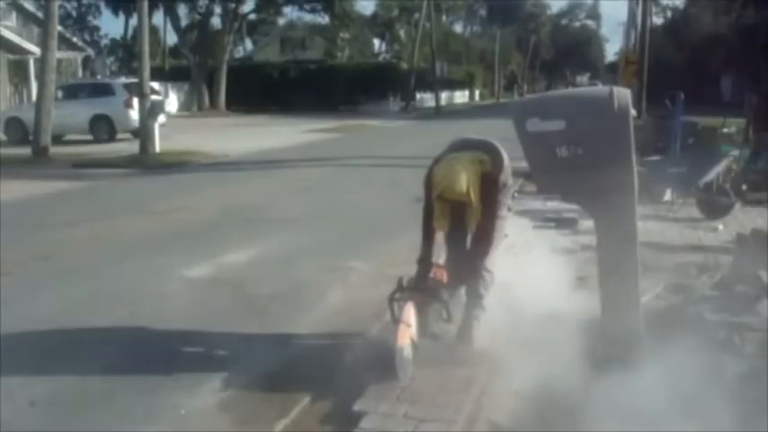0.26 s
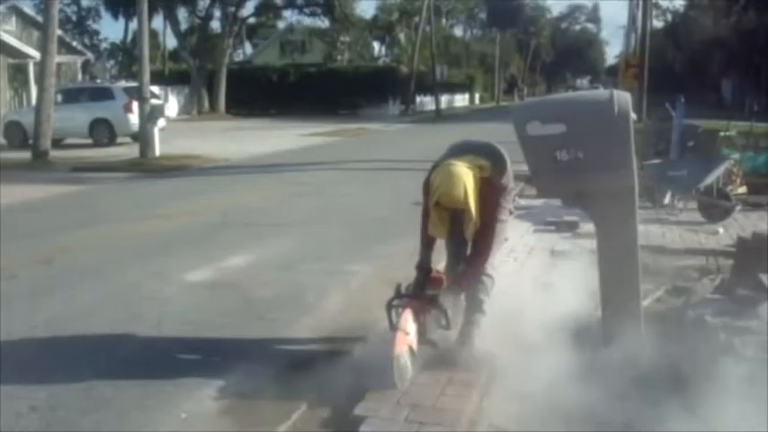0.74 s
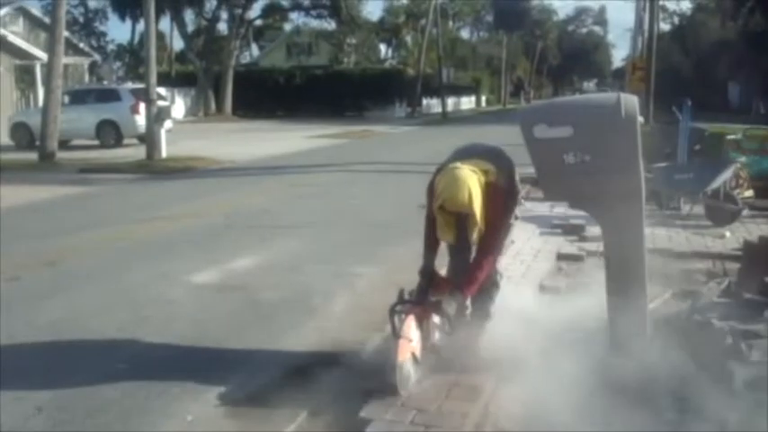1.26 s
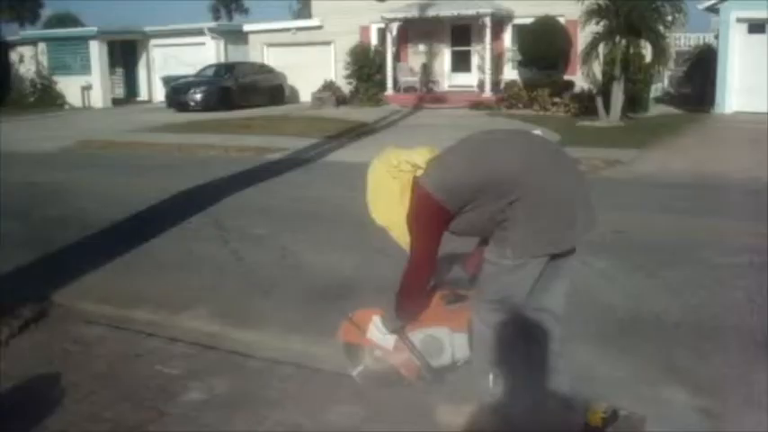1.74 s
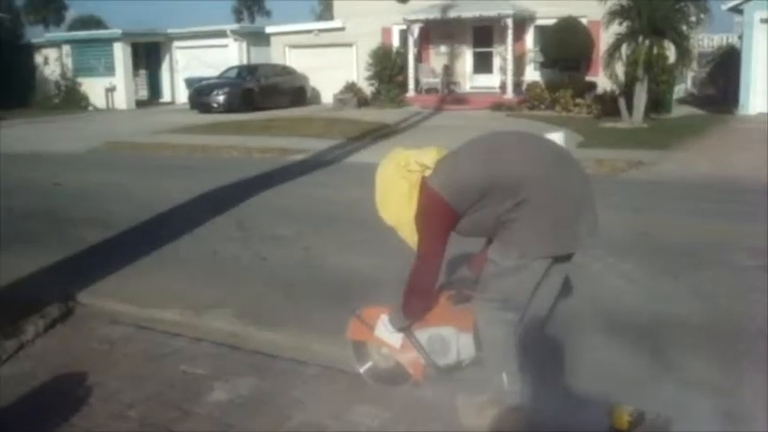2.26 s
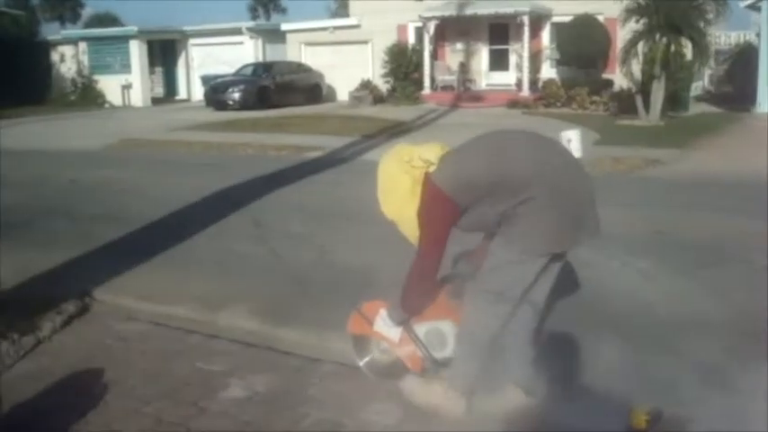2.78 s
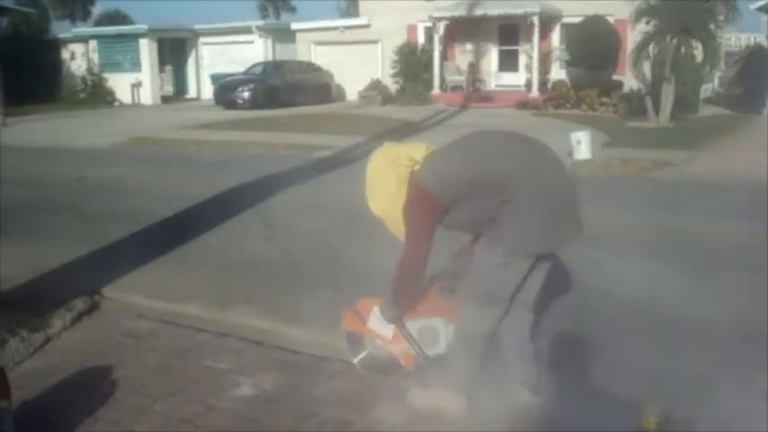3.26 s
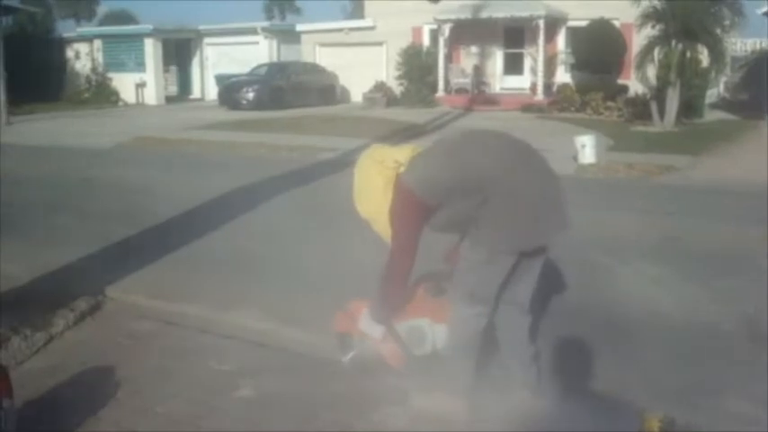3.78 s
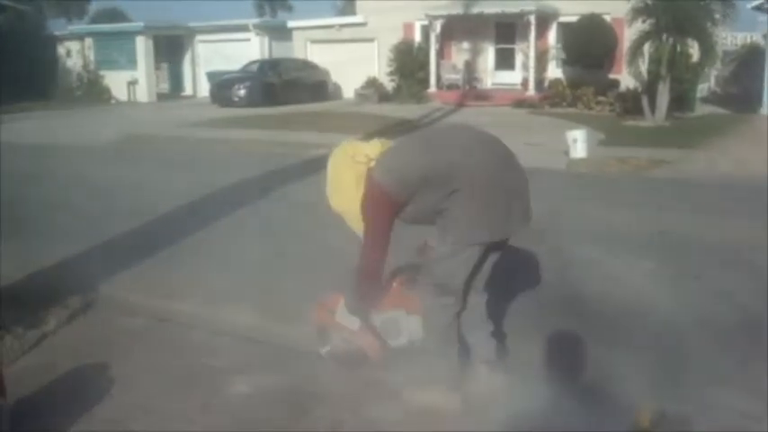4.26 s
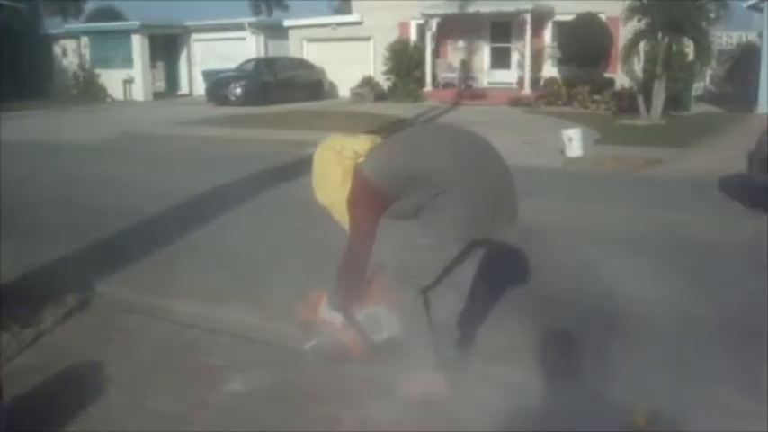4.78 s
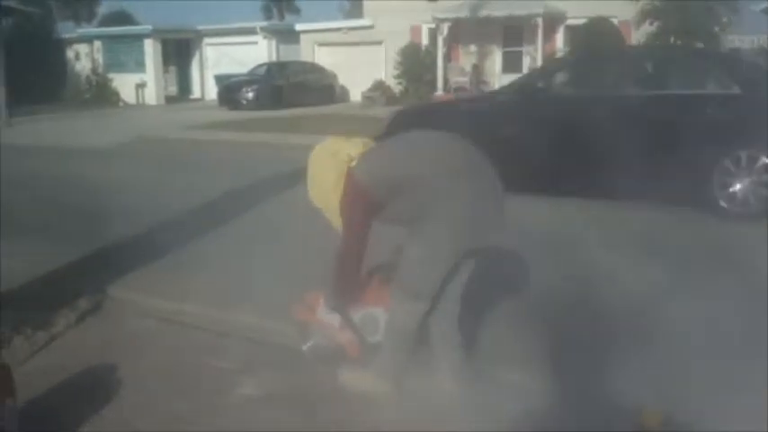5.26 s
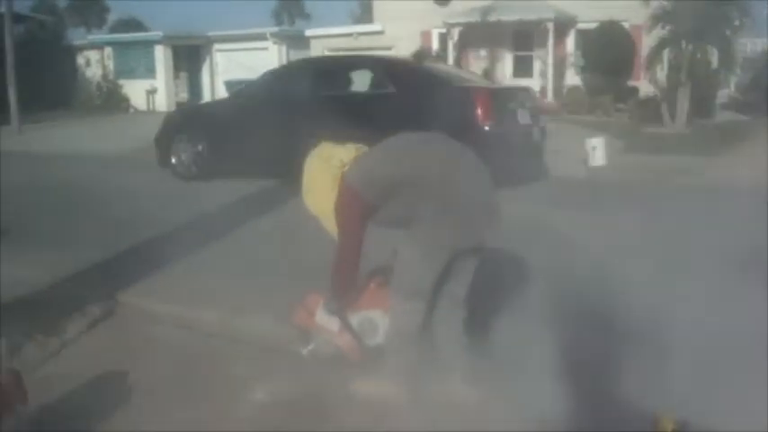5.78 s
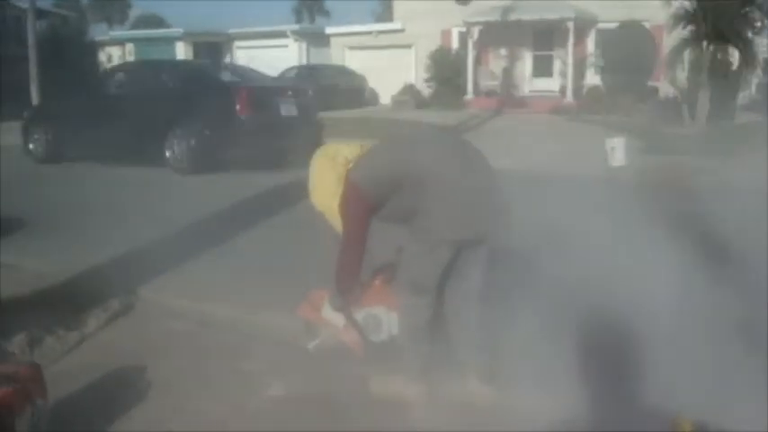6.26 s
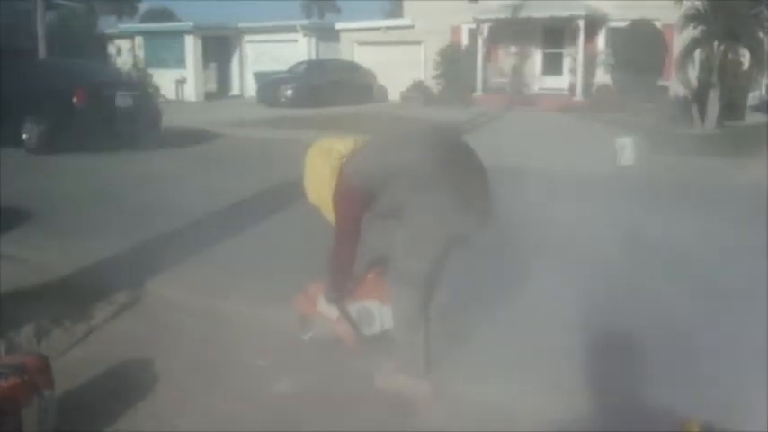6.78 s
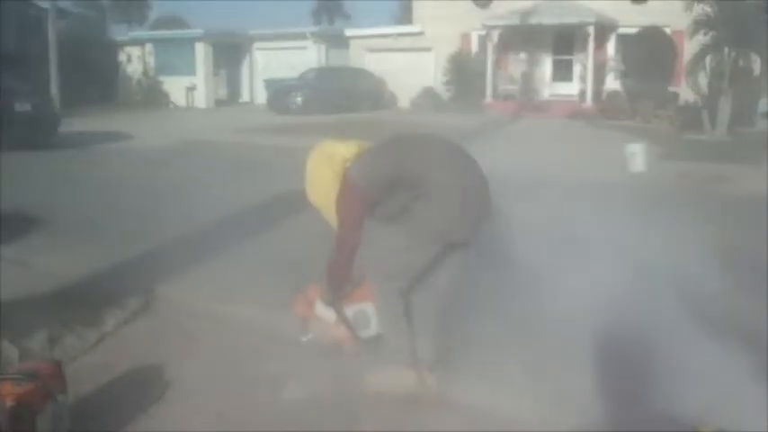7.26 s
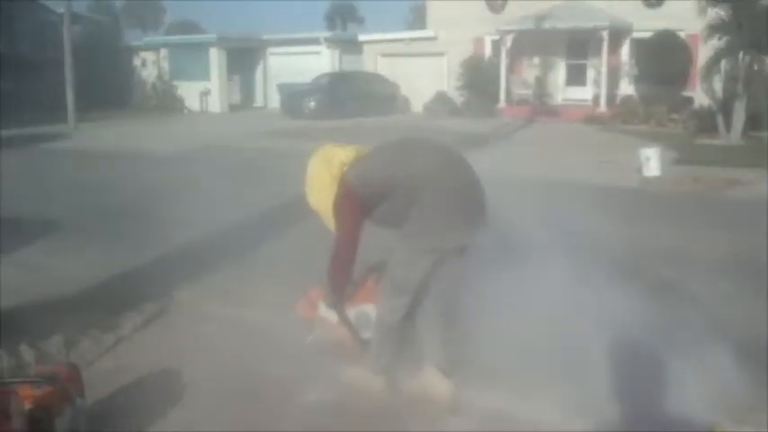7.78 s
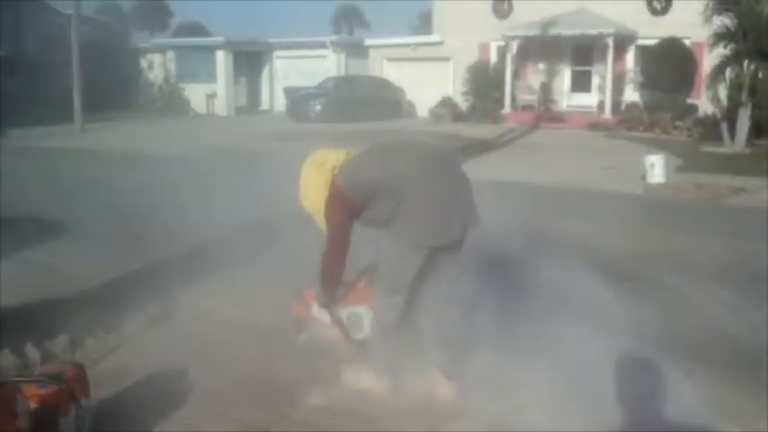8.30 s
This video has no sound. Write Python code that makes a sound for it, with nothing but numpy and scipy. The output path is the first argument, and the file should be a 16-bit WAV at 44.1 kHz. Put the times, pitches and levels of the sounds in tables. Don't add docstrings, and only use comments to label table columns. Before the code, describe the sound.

A petrol cut-off saw grinds through concrete on an open street, engine surging and sagging while the blade hisses and rings brightly and continuously.

```python
import sys
import numpy as np
from scipy import signal
from scipy.fft import rfft, irfft, next_fast_len
from scipy.io import wavfile
from scipy.ndimage import uniform_filter1d

SR = 44100
rng = np.random.default_rng(int(sys.argv[2]) if len(sys.argv) > 2 else 0)


def ratio_of_db(decibels):
    return 10 ** (np.asarray(decibels, float) / 20)


def dump_mix(stems):
    frames = np.atleast_2d(stems).T
    limited = np.clip(frames, -1, 1)
    pcm = np.round(limited * 32767).astype(np.int16)
    wavfile.write(sys.argv[1], SR, pcm)


N = 376162
MOVE_S = 1.79


def rms_one(x):
    return x / np.sqrt(np.mean(np.abs(x) ** 2) + 1e-20)


def in_time(rows):
    s, *columns = np.transpose(rows)
    return [np.interp(np.arange(N) / SR, s, c) for c in columns]


def by_spot(first, second):
    return np.where(np.arange(N) < MOVE_S * SR, first, second)


def drift(rate):
    r = np.exp(-40 * np.pi * rate / SR)
    noise = rng.standard_normal(N // 20 + 2002)
    slow = signal.lfilter([1], [1, -2 * r, r * r], noise)[2000:]
    return np.interp(np.arange(N) / 20, np.arange(len(slow)), rms_one(slow))


def coloured(x, table):
    size = next_fast_len(N + SR // 4)
    log_hz = np.log(np.arange(size // 2 + 1) * SR / size + 1)
    at, *spots = np.transpose(table)
    spectrum = rfft(x, size)
    heard = [irfft(spectrum * ratio_of_db(np.interp(log_hz, np.log(at), db)), size)[:N] for db in spots]
    return by_spot(*heard)


def lowpassed(x, order, hz):
    sos = signal.butter(order, hz, fs=SR, output="sos")
    return signal.sosfiltfilt(sos, x, padtype="even", padlen=SR // 10)


# (time [s], level [dB])
FAR_HUM = [
    (0, -90),
    (4, -88),
    (5.5, -69),
    (7, -73),
    (8.53, -65),
]
HUM_HZ = 91.5


def hum():
    phase = 2 * np.pi * HUM_HZ * np.arange(N) / SR
    steady = ratio_of_db(in_time(FAR_HUM)[0] - 2.5) * (np.sin(phase) + 1.6 * np.sin(2 * phase))
    wavering = ratio_of_db(-65.5 + 3 * drift(3)) * np.sin(3 * phase + drift(7.2))
    return steady + wavering


# (time [s], pressure on the stone [dB], grit brightness [dB], engine labour [dB])
PRESSURE = [(0, -1.5, -1.5, -0.5), (.22, -1.5, -4, 1), (.45, -0.5, -2.5, 0.5), (.97, -.5, -3.5, 0),
            (1.25, -0.5, -2.5, 1), (1.76, -0.5, -3, -0.5), (1.82, -1.5, -2, -1), (2.9, -3, -1, 0),
            (3.5, -2, 0, 0), (3.76, -0.5, 1, -1), (4.2, -1.5, 0, -1), (4.6, -1, 2, 0.5), (5.1, -2.5, 1, 0),
            (5.35, 0, 1, -0.5), (6.05, -1, 1, 0.5), (6.75, -.5, 0.5, 0), (7.8, -0.8, 2, 1.5),
            (8.53, 0.5, 0, -0.5)]
# (rumble, low modes, high modes, hiss [dB per dB])
FOLLOWS = (.3, 1.13, 0.3, 1.1)
# (time [s], high modes [dB], low modes [dB])
SNAGS = [(.18, -0.5, -1), (.3, -3.5, -1), (.47, 2.5, 0), (.65, 2.5, 3), (.78, 0.5, 0.5), (.95, 0, -1.5),
         (1.17, -2.5, 1), (1.45, 2, 0), (1.92, 4.5, 0), (2.08, -2.5, -0.5), (2.27, 2.5, 0.5), (3.15, 4, 1),
         (3.75, 0.5, 2), (3.9, 3.5, 0), (4.12, -2, -1.5), (4.23, 1.5, -0.5), (4.42, 1.5, -1),
         (5.12, 1, -1.5), (5.27, 3.5, -1.5), (5.96, 1.5, 0.5), (6.08, -0.5, 5), (6.72, -1.5, 0),
         (7.0, -1, 1), (7.55, -2, -0.5), (8.07, 4, 0.5), (8.53, 3.5, -0.5)]
SNAG_S, SNAG_HISS_SHARE = 0.055, 0.2
WANDER_DB, WANDER_PER_S = 0.7, 11.1


def cutting():
    pressure_db, bright_db, labour_db = in_time(PRESSURE)
    t = np.arange(N) / SR
    snag_db, snag_low_db = sum(np.outer(db, np.exp(-((t - s) / SNAG_S) ** 2)) for s, *db in SNAGS)
    extras = (labour_db, snag_low_db, snag_db - 0.5 * bright_db, SNAG_HISS_SHARE * snag_db + bright_db)
    swings = [share * pressure_db + extra + WANDER_DB * drift(WANDER_PER_S)
              for share, extra in zip(FOLLOWS, extras)]
    moved = round(MOVE_S * SR)
    return [c - by_spot(c[:moved].mean(), c[moved:].mean()) for c in swings]


def shake(turns, depth):
    return 1 + depth * np.cos(2 * np.pi * turns)


HISS_EDGES_HZ = (6900, 7900, 9000)
MOTTLE_DB, MOTTLE_PER_S = 1.0, 4.0


def mottled(hiss):
    below = [0]
    for hz in HISS_EDGES_HZ:
        below.append(signal.sosfilt(signal.butter(3, hz, fs=SR, output="sos"), hiss))
    below.append(hiss)
    return sum((b - a) * ratio_of_db(MOTTLE_DB * drift(MOTTLE_PER_S)) for a, b in zip(below, below[1:]))


# (frequency [Hz], first level [dB per Hz], second level [dB per Hz])
RUB = [(60, -100, -96), (100, -99.5, -91), (200, -85, -88), (363, -85, -82.5), (653, -67.5, -71),
       (960, -73.5, -70), (1302, -79.5, -81.5), (2004, -65.5, -66.5), (2046, -71.5, -75.5),
       (2650, -66, -67.5), (3290, -64, -65), (4600, -63.5, -71), (4900, -59, -66.5), (6700, -66.5, -70.5),
       (10700, -71.5, -70)]


def rubbing(turns, rumble_db, body_db, hiss_db, patchy_db=0.93, gust_db=5.5):
    grain_size = ratio_of_db(1.6 * rng.standard_normal(N // 40 + 1)).repeat(40)[:N]
    grit = rms_one(rng.standard_normal(N) * grain_size) * np.sqrt(SR / 2)
    noise = coloured(grit, RUB) * shake(turns, by_spot(0.084, 0.038))
    breeze, low, mid = [lowpassed(noise, 2, hz) for hz in (110, 2600, 6000)]
    lag = (0.004106 + 6e-6 * drift(0.7)) * SR
    noise = noise - 0.54 * np.interp(np.arange(N) - lag, np.arange(N), noise - mid, left=0)
    out = breeze * ratio_of_db(gust_db * drift(4) - 6)
    ranges = (low - breeze, mid - low, mottled(noise - mid))
    for part, db in zip(ranges, (rumble_db, body_db, hiss_db)):
        out = out + part * ratio_of_db(db + patchy_db * drift(20.4))
    return out


BLADE_HZ = [1776, 2261, 2466, 2650, 2968, 3095, 3187, 3286, 3437, 3522, 3722, 3960, 4040, 4165, 4484, 4570,
            4652, 4840, 5155, 5312, 5809, 6212, 6475, 7390, 7671, 7881, 8312, 8613, 9862, 610]
# (width [Hz], shift [Hz per extra turn per s], first level [dB], second level [dB])
BLADE = [(65, -1.5, -46, -45.5), (46.3, 0, -45, -49.5), (52, -2, -61.5, -47), (60, -2, -62.5, -51.5),
         (50.3, -2, -37, -43), (51.3, 3, -43, -41.5), (46.5, 3, -45, -38.5), (35, 0.5, -40.5, -40.5),
         (27, -4, -42, -45), (50, 0.5, -36.5, -48), (45.2, -5, -47, -43.5), (45, -1.5, -53, -42.5),
         (40, 0, -42, -44), (35, -1.5, -39.5, -49.5), (22, -0.5, -50, -43), (40, 1.5, -44, -40.5),
         (62, 3, -33.5, -38.5), (25, 0, -66, -40.5), (66, 6.5, -45, -39), (51, 3.5, -37, -38.5),
         (60, 0.5, -38, -40.5), (36, 0.5, -63, -70), (65, -1, -41.5, -48), (150, 9.5, -39, -57),
         (60, 7, -53, -56.5), (150, 9.5, -40.5, -58), (50, 1, -47, -60.5), (60, 6, -48, -51),
         (100, -1, -67, -50), (40, 3, -50, -58.5)]
# (mode counted from 0, lean [dB per extra turn per s])
LEANING = [
    (6, -0.32),
    (7, 0.17),
    (8, 0.02),
    (13, 1.2),
    (19, -0.5),
]


def blade(turns, speed, rumble_db, low_db, high_db, hiss_db, swell_db=2.0):
    out, t = np.zeros(N), np.arange(N) / SR
    extra_speed = by_spot(0, speed - 120)
    lean = {round(k): db for k, db in LEANING}
    for k, (hz, (width, shift, first_db, second_db)) in enumerate(zip(BLADE_HZ, BLADE)):
        phase = 2 * np.pi * (hz * t + shift * (turns - 120 * t))
        tone = drift(width * 0.54) * np.cos(phase) + drift(width * 0.68) * np.sin(phase)
        push_db = rumble_db if hz < 2700 else low_db if hz < 4300 else high_db if hz < 6000 else hiss_db
        level_db = by_spot(first_db, second_db) + lean.get(k, 0) * extra_speed
        out += tone * ratio_of_db(level_db + push_db + swell_db * drift(3.6))
    return out * shake(turns, by_spot(0.23, 0.049))


# (start [s], end [s], speed at start [turns per s], speed at end [turns per s])
SPURTS = [(.16, .28, 110.4, 112.0), (.6, .8, 111.7, 114.2), (1.03, 1.41, 112.5, 115.3),
          (1.72, 1.87, 112.3, 117.0), (2.09, 2.42, 115.4, 120.3), (2.86, 3.07, 116.5, 120.2),
          (3.4, 3.64, 117.8, 120.0), (3.89, 4.23, 116.7, 121.2), (4.67, 4.93, 116.2, 120.0),
          (5.12, 5.47, 117.6, 120.9), (5.72, 5.98, 118.4, 121.1), (6.26, 6.6, 117.5, 122.6),
          (6.76, 7.03, 121.2, 124.9), (7.25, 7.8, 120.9, 127.8), (8.02, 8.42, 125.2, 130.3)]
START_SPEED, END_SPEED = 111.7, 129.8
FLYWHEEL_S, SWITCH_S = 0.07, 0.03
HELD_SHARE, SPURT_SHARE = 0.95, 0.05


def hunting():
    start, end, low, high = np.transpose(SPURTS)
    t = np.arange(N) / SR
    s = np.r_[0, np.ravel([start, end], "F"), N / SR]
    speed = np.interp(t, s, np.r_[START_SPEED, np.ravel([low, high], "F"), END_SPEED])
    spurting = np.searchsorted(s[1:], t) % 2
    cut = uniform_filter1d(np.where(spurting, SPURT_SHARE, HELD_SHARE), round(SWITCH_S * SR))
    return uniform_filter1d(speed, round(FLYWHEEL_S * SR), mode="nearest"), np.clip(cut, 0, 1)


# (frequency [Hz], first level [dB], second level [dB])
EXHAUST = [(60, -99, -84.5), (115, -76, -75.5), (238, -69, -65), (290, -50.5, -52.5), (360, -60.5, -55),
           (464, -61, -58.5), (567, -55, -57), (700, -46, -69.5), (800, -85, -86.5), (921, -48.5, -57.5),
           (970, -49.5, -49.5), (1090, -55.5, -58), (1340, -54.5, -76.5), (1640, -61, -52.5),
           (2400, -46.5, -56)]
# (frequency [Hz], width [Hz], first level [dB], second level [dB])
HOUSING = (988.5, 16, -8.5, 0.5)
# (time [s], level [dB])
GRIP = [(0, -56), (1.8, -47), (2.6, -39.5), (3.05, -46.5), (3.8, -43), (4.45, -38.5), (4.75, -44),
        (5.0, -41.5), (5.3, -52.5), (6.25, -34.5), (6.4, -46), (6.6, -39.5), (7.05, -44.5), (7.45, -44.5),
        (7.75, -47), (8.3, -45.5), (8.53, -34)]
# (multiple of speed, first level [dB], second level [dB])
PUMPING = [
    (1, -70.5, -72),
    (2, -59.5, -69),
    (4, -57, -60.5),
    (5, -57, -48.5),
    (6, -52, -71.5),
    (7, -74, -66.5),
]
PUMP_GAIN_DB = 2.04
FIRING_WANDER_DB, FIRING_FOLLOWS = 0.4, 1.1


def engine(turns, speed, cut, uneven_db=1.0, jitter_s=0.00003):
    ring_db = in_time(GRIP)[0]
    firing_db = FIRING_FOLLOWS * in_time(PRESSURE)[2] + FIRING_WANDER_DB * drift(3.5)
    number = np.arange(1, int(turns[-1]))
    at = np.interp(number, turns, np.arange(N))
    luck = rng.standard_normal((len(number), 2))
    strength = np.where(number % 3 == 0, 1, 1 - cut[at.astype(int)]) * ratio_of_db(uneven_db * luck[:, 0])
    blows = np.zeros(N)
    blows[np.clip(at + jitter_s * SR * luck[:, 1], 0, N - 1).astype(int)] = strength
    blows *= SR / speed / np.sqrt(2) * ratio_of_db(firing_db - 1.0 - 1.5 * cut)
    blows = signal.sosfiltfilt(signal.butter(2, [40, 2600], "band", fs=SR, output="sos"), blows)

    hz, width, first_db, second_db = HOUSING
    r = np.exp(-np.pi * width / SR)
    poles = [1, -2 * r * np.cos(2 * np.pi * hz / SR), r * r]
    rung = rms_one(signal.lfilter([(1 - r * r) / 2, 0, (r * r - 1) / 2], poles, blows))
    rung = ratio_of_db(by_spot(first_db, second_db) + ring_db) * rung

    pumped = np.zeros(N)
    for k, a, b in PUMPING:
        gain_db = (round(k) > 5) * PUMP_GAIN_DB * (speed - 120)
        pumped += ratio_of_db(by_spot(a, b + gain_db) + 1.5) * np.cos(2 * np.pi * round(k) * turns)
    return pumped + coloured(blows, EXHAUST) + rung


def scene():
    speed, cut = hunting()
    turns = np.cumsum(speed) / SR
    rumble_db, low_db, high_db, hiss_db = cutting()
    saw = rubbing(turns, rumble_db, (low_db + high_db) / 2, hiss_db)
    saw += blade(turns, speed, rumble_db, low_db, high_db, hiss_db)
    saw += engine(turns, speed, cut)
    return np.tile(hum() + saw, (2, 1))


def band_limit(x):
    return signal.sosfilt(signal.butter(12, 11230, fs=SR, output="sos"), x)


# (frequency [Hz], level [dB])
ANTI_ALIAS = [
    (9980, 0),
    (10140, -16),
    (10200, -40),
    (10280, -80),
    (10320, -110),
]


def record(dry):
    gain = ratio_of_db(np.interp(np.arange(N // 2 + 1) * SR / N, *np.transpose(ANTI_ALIAS)))
    rounded = 0.43 * np.tanh(dry / 0.47)
    mix = irfft(rfft(rounded) * gain, N)
    return band_limit(mix)


dry = scene()
out = record(dry)
dump_mix(out)
```